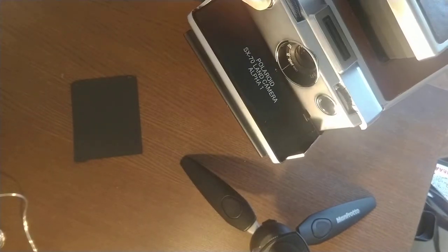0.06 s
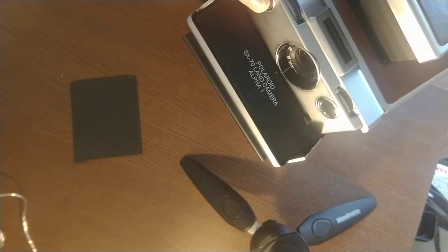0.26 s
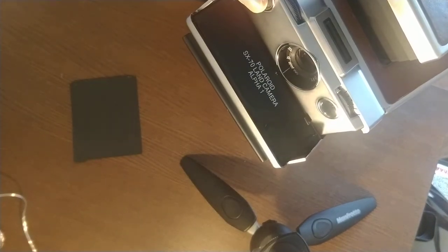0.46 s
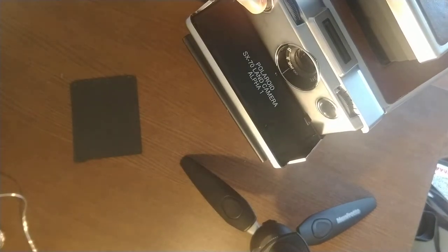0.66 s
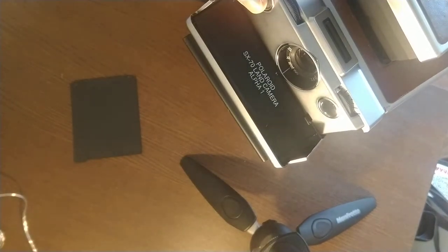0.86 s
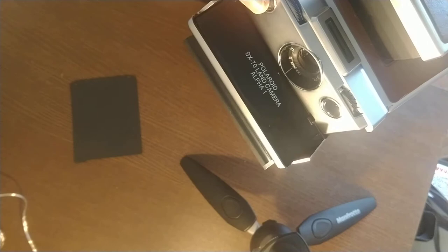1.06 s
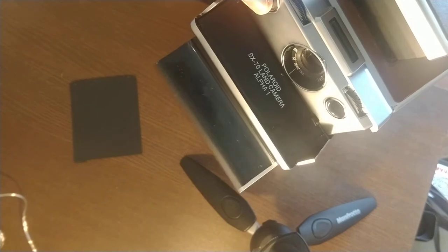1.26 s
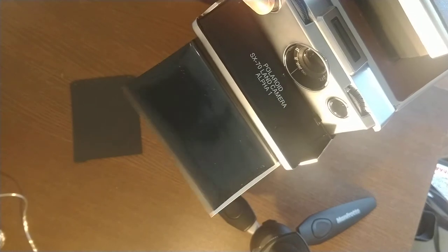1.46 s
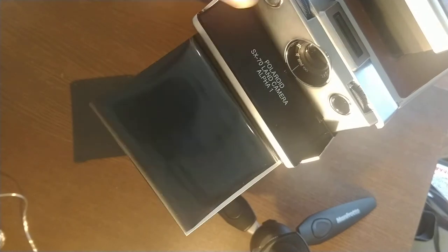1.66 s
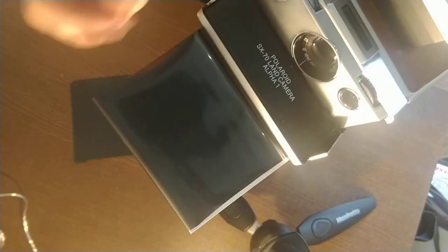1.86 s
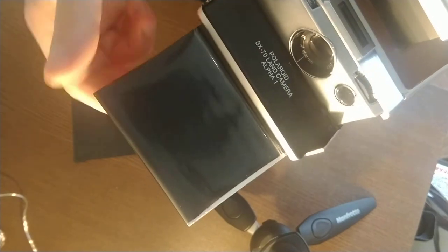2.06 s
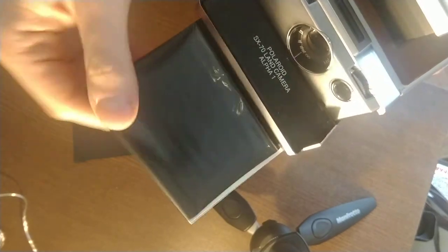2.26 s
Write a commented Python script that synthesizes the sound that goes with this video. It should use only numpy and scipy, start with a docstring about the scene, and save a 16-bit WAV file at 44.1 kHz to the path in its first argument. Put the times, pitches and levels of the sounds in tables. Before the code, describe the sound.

Instant camera shutter clicks and a geared motor whirring as it ejects a print, close up.

```python
"""An instant camera on a table takes a picture and pushes out the print, close to a stereo microphone.
Over quiet room air the shutter clicks, a small geared motor winds briefly, and the mirror slaps up,
ringing the body and rattling loose parts. The shutter clicks again and the motor restarts, humming,
growling and hissing as it labours to feed the print through rumbling rollers. A spring latch snaps and
leaves a thin metal ring; the motor runs free, then coasts to a stop."""
import sys
import numpy as np
from scipy import signal
from scipy.fft import rfft, irfft
from scipy.io import wavfile
from scipy.ndimage import uniform_filter1d

SR = 44100
rng = np.random.default_rng(int(sys.argv[2]) if len(sys.argv) > 2 else 0)


def master(y):
    """Save y as 16-bit WAV."""
    cut = np.clip(np.atleast_2d(y).T, -1, 1)
    pcm = np.round(cut * 32767)  # scale
    wavfile.write(sys.argv[1], SR, pcm.astype(np.int16))


N = 101429
T, HZ = np.arange(N) / SR, np.fft.rfftfreq(N, 1 / SR)

# tone of the room air: freq_hz, level_db
AIR_COLOUR = [(25, -7.5), (60, 5.5), (100, 15), (140, -2.5), (300, -9.5), (700, -9.5), (1500, -16.5),
              (3000, -19), (8000, -25.5), (15000, -27.5)]
# tone of the reflections from table and room: freq_hz, gain_db
REFLECTION_EQ = [(100, 14.5), (1500, -5), (5000, 2), (14000, -2.5)]
# phase of the right microphone port in the bass and mids: freq_hz, lag_rad
RIGHT_PORT_LAG = [(30, -6.2), (80, -5.8), (170, -4.3), (330, -2.9), (800, -1.2), (1650, .8), (2100, 0)]
# share of the clatter that reaches each port by its own path: freq_hz, gain_db
SCATTER_EQ = [(100, -17.5), (600, -5), (1500, -33), (2600, -8.5), (3800, -11.5), (6000, 1.5), (9000, -10.5),
              (14000, -21.5)]
# stereo lean of the camera: freq_hz, left_minus_right_db
PORT_BALANCE = [(170, 9), (320, -6.5), (550, 1), (900, -1), (1550, 3.5), (2300, 0), (3800, 0.5), (5500, 3),
                (7300, 9), (9300, 0.5), (10300, 4.5), (14000, -3)]

# rumble of the rollers as they grip the print: time_s, level_db
ROLLER_LEVEL = [(.55, -67), (.75, -62), (1.02, -75.5), (1.2, -64), (1.62, -63), (2.05, -62.5), (2.2, -85.5)]
# tone of that rumble: freq_hz, level_db
ROLLER_COLOUR = [(60, -20), (120, -12), (170, -1), (250, -10), (400, 2.5), (900, -48)]
# soft bumps of the camera on its stand: start_s, level_db, pitch_hz
STAND_BUMPS = [(0.692, -47.5, 164.8), (0.694, -53.5, 78.6), (1.621, -47, 209.9), (1.84, -60, 75.37)]
# thin metal left ringing by the latch: pitch_hz, level_db
METAL_TONES = [(1411, -79.5), (1766, -86)]
# tone of the loose parts: freq_hz, level_db
RATTLE_COLOUR = [(100, -30), (200, 1), (280, -16.5), (550, 3), (780, 2), (1000, -9), (1450, -13),
                 (2200, -10.5), (3400, -16.5), (8000, -15.5), (12000, -29.5)]
# jolts of the frame by mirror and latch: start_s, level_db, pitch_hz
FRAME_JOLTS = [(0.3899, -12, 798), (1.7058, -26, 423.4)]

# small clicks of shutter, cams and switches: start_s, snap_db, knock_db, decay_s
CLICK_HITS = [(0.1357, -39.5, -41, 0.011), (0.1471, -28.5, -34, 0.0024), (0.3054, -32, -29, 0.0028),
              (0.3088, -44, -32, 0.0023), (0.3893, -28, -22, 0.003), (0.488, -40, -46, 0.0087),
              (0.4937, -24.5, -36, 0.0019), (.878, -37, -52, 0.00097), (1.3911, -42, -30, 0.0027),
              (1.6271, -31.5, -27, 0.0013), (1.7036, -25, -22, 0.0031), (2.0237, -21, -32.5, 0.0019)]
# bright top of a click: freq_hz, level_db
SNAP_COLOUR = [(1000, -56), (2200, 10), (3400, 1), (4700, 4), (5900, 2.5), (8300, 7.5), (11000, 2),
               (14000, 9), (16000, -20)]
# dull bottom of a click: freq_hz, level_db
KNOCK_COLOUR = [(60, -43.5), (220, -22), (450, -5), (750, -11.5), (1000, -8), (1700, 1.5), (2200, -5),
                (4000, -12), (8000, -39)]
# shutter blades closing, then opening: start_s, level_db
SHUTTER_HITS = [(.1475, -1), (.4937, 3.5)]
# ring of the blades: pitch_hz, level_db, t60_s
BLADE_MODES = [(741, -41, 0.081), (1110, -50, 0.016)]
# the mirror slapping up and chattering: start_s, level_db
MIRROR_HITS = [(.3904, -5), (.4005, -16.5), (.4175, -15.5), (.432, -23), (.453, -20.5)]
# ring of the camera body: pitch_hz, level_db, t60_s
BODY_MODES = [(178, -37, 0.24), (216, -34.5, .24), (320, -31, 0.07), (410, -30, 0.06), (513, -26, .06),
              (632, -28.5, 0.13), (720, -29, .08), (791, -25, .05), (880, -24.5, 0.05), (1269, -19, 0.019),
              (1600, -17, 0.016)]
# blows of the spring latch: start_s, level_db
LATCH_HITS = [(1.7057, -2.5), (1.7465, -18.5)]
# ring of the latch: pitch_hz, level_db, t60_s
LATCH_MODES = [(1592, -11.5, 0.06), (1690, -27, 0.055), (1584, -23, 0.38), (668, -42, .3), (3250, -26, .03),
               (5740, -29.5, 0.069)]

# motor speed, sagging under load: time_s, turns_per_s
MOTOR_SPEED = [(.19, 74), (.255, 144), (.29, 164), (.32, 158), (.38, 104), (.53, 70), (.6, 136),
               (.665, 174), (.75, 148), (.81, 161), (.9, 147), (.96, 162.4), (1.05, 158), (1.235, 156),
               (1.29, 159), (1.645, 162), (1.695, 145), (1.72, 176), (1.81, 173), (2.03, 173.3), (2.17, 61)]
# fader ride of the motor's hum: time_s, level_db
HUM_LEVEL = [(.2, -64), (.24, -53), (.3, -44), (.35, -67), (.56, -63), (.6, -51), (.8, -46), (.93, -44.5),
             (1.14, -47), (1.3, -46), (1.69, -45), (1.735, -55), (1.81, -43.5), (1.93, -43), (1.97, -40),
             (2.02, -41.5), (2.032, -70)]
# harmonics of the hum: multiple_of_speed, loaded_db, free_db
HUM_HARMONICS = [(2, -21.5, -19), (3, -5, 0), (4, -5, -25.5), (5, -5.5, -31), (6, -20, -15.5),
                 (7, -15.5, -16), (9, -20.5, -6.5)]
# fader rides of the gear train: time_s, growl_db, hiss_db
GEAR_LEVELS = [(.14, -89, -60), (.185, -56, -55.5), (.22, -37.5, -49), (.25, -43, -42), (.315, -46, -46),
               (.375, -50, -54.5), (.48, -60, -65), (.535, -50, -54), (.575, -41, -45.5), (.72, -43.5, -40),
               (1.0, -46, -41), (1.68, -44.5, -40.5), (1.78, -44, -44.5), (1.95, -46.5, -43),
               (2.05, -43, -40.5), (2.12, -59.5, -54.5), (2.18, -78, -78)]
# tone of the gears' growl: freq_hz, level_db
GROWL_COLOUR = [(40, -25), (120, -12.5), (180, -10.5), (270, -32), (380, -11.5), (520, 0.5), (800, 2.5),
                (930, -4.5), (1450, 7.5), (1720, 4.5), (2200, -0.5), (3000, -23), (6000, -53)]
# resonances of the gear housing, on top of the growl: centre_hz, width_hz, boost_db
HOUSING_PEAKS = [(510, 40, 7), (632, 40, 6), (745, 45, 7), (812, 40, 6), (1150, 70, 5)]
# tone of the gears' hiss: freq_hz, level_db
HISS_COLOUR = [(900, -38.5), (2000, -12.5), (2900, -0.5), (4400, -1), (5000, -2), (5900, 0), (6600, -2.5),
               (7600, 3.5), (9500, 3), (10900, -1.5), (12500, -8), (13800, 2), (14700, -17.5),
               (15400, -64.5)]
# narrow resonances of gears and frame, on top of the hiss: centre_hz, width_hz, boost_db
WHINE_PEAKS = [(3816, 210, 6.5), (5721, 36, 6.5), (6050, 37, 6), (7500, 52, 9.5), (7980, 49, 3.5),
               (8100, 40, 9), (8400, 110, 3.5)]


def amp(db):
    """Decibels to gain."""
    return 10 ** (np.asarray(db) / 20)


def unit_rms(x):
    """Scales to rms 1."""
    return x / np.sqrt(np.mean(x ** 2) + 1e-20)


def automation(rows):
    """One lane per value column of a time table, its points joined by straight lines."""
    times, *columns = np.transpose(rows)
    return [np.interp(T, times, column) for column in columns]


def eq_curve(points):
    """Draws a frequency table across the spectrum, on a log axis."""
    hz, value = np.transpose(points)
    return np.interp(np.log(HZ + 1), np.log(hz), value)


def bells(rows):
    """Resonances as bell-shaped boosts in dB."""
    return sum(db / (1 + (2 * (HZ - hz) / width) ** 2) for hz, width, db in rows)


def tint(x, gain):
    """Filters x, keeping the power of white noise."""
    return irfft(rfft(x) * unit_rms(gain), N)


def low_cut(x, cutoff_hz=120):
    """Small parts radiate no deep bass."""
    return signal.sosfilt(signal.butter(2, cutoff_hz, "high", fs=SR, output="sos"), x)


def noise(colour):
    """Coloured noise of about rms 1."""
    return tint(rng.standard_normal(N), amp(eq_curve(colour)))


def wander(rate_hz):
    """Random drift of rms 1, rolling off above the given rate."""
    return unit_rms(tint(rng.standard_normal(N), np.exp(-(HZ / rate_hz) ** 2)))


def shimmer(x, depth_db=2.2):
    """The colour flickers in random patches about 40 ms long and 130 Hz wide."""
    spectra = signal.stft(x, nperseg=1024, noverlap=768)[2]
    patches = uniform_filter1d(rng.standard_normal(spectra.shape[::-1]), 7, axis=0)  # along time
    patches = uniform_filter1d(patches, 3, axis=1)  # along frequency
    gain = unit_rms(amp(depth_db * unit_rms(patches.T)))
    return signal.istft(spectra * gain, nperseg=1024, noverlap=768)[1][:N]


def envelope(start_s, attack_s, decay_s):
    """A straight attack, then exponential decay."""
    age = np.maximum(T - start_s, 0)
    return np.minimum(age / attack_s, 1) * np.exp(-np.maximum(age - attack_s, 0) / decay_s)


def thumps(hits, attack_s, decay_s):
    """One damped sine per hit."""
    return sum(amp(db) * envelope(start, attack_s, decay_s) * np.sin(2 * np.pi * hz * (T - start))
               for start, db, hz in hits)


def strike(hits, modes):
    """Damped modes of alternating sign, set ringing by each hit."""
    ring = sum((-1) ** k * amp(db - 60 * np.minimum(T / t60, 2)) * np.sin(2 * np.pi * hz * T)
               for k, (hz, db, t60) in enumerate(modes))
    return sum(amp(db) * np.interp(T - start, T, ring, left=0) for start, db in hits)


def mic_ports(x, left_delay_s=.000412):
    """Two microphone ports of opposite polarity; the left one hears the treble later."""
    left = -np.exp(-2j * np.pi * HZ * left_delay_s)
    right = np.exp(-1j * eq_curve(RIGHT_PORT_LAG))
    return irfft(rfft(x) * np.array([left, right]), N)


def room_air():
    """A quiet bed of air, mostly shared by the ports, with a little of its own in each."""
    shared = mic_ports(noise(AIR_COLOUR))
    separate = np.array([noise(AIR_COLOUR), noise(AIR_COLOUR)])
    return amp(-69) * (shared + .3 * separate)


def reflections(x, early_t60_s=.059, late_t60_s=.13, late_db=3.5):
    """Quick reflections from the table and a short room tail, different at each port."""
    t = T[:SR // 2]
    fade = (amp(-60 * t / early_t60_s) + amp(late_db - 60 * t / late_t60_s)) * (t > .001)
    tail = rng.standard_normal((2, len(t))) * fade / np.linalg.norm(fade)
    send = irfft(rfft(x) * amp(eq_curve(REFLECTION_EQ)), N)
    return amp(-4.5) * signal.fftconvolve(send[None], tail, axes=1)[:, :N]


def rollers():
    """A low rumble while the rollers turn."""
    turning = (T > ROLLER_LEVEL[0][0]) & (T < ROLLER_LEVEL[-1][0])
    return noise(ROLLER_COLOUR) * amp(automation(ROLLER_LEVEL)[0]) * turning


def metal_ring():
    """Faint metal tones come in with the latch and hold, outlasting the motor."""
    tones = np.sqrt(2) * sum(amp(db) * np.sin(2 * np.pi * hz * T) for hz, db in METAL_TONES)
    return tones * envelope(LATCH_HITS[0][0], attack_s=.01, decay_s=np.inf)


def stand_bumps():
    """The whole camera bumps on its stand, low and soft."""
    return thumps(STAND_BUMPS, attack_s=.0042, decay_s=.023)


def rattle():
    """Loose parts rattle after the mirror's slap."""
    return amp(-33.5) * noise(RATTLE_COLOUR) * envelope(MIRROR_HITS[0][0], attack_s=.00088, decay_s=.045)


def frame_jolts():
    """Mirror and latch each jolt the frame: one hard push that dies at once."""
    return thumps(FRAME_JOLTS, attack_s=.00078, decay_s=.00079)


def clicks(attack_s=.0007, tail_db=-24, tail_s=.016):
    """Each click layers a bright snap on a duller knock, with a short tail in the housing."""
    snap, knock, track = noise(SNAP_COLOUR), noise(KNOCK_COLOUR), np.zeros(N)
    for start, snap_db, knock_db, decay_s in CLICK_HITS:
        shape = envelope(start, attack_s, decay_s) + amp(tail_db) * envelope(start, attack_s, tail_s)
        track += shape * (amp(snap_db) * snap + amp(knock_db) * knock)
    return track


def shutter():
    """The blades ring briefly as they close and open."""
    return strike(SHUTTER_HITS, BLADE_MODES)


def body_ring(click_send_db=-14):
    """The mirror's slap, and more faintly each click, rings the camera body."""
    knocks = [(start, knock_db + click_send_db) for start, _, knock_db, _ in CLICK_HITS]
    return strike(MIRROR_HITS + knocks, BODY_MODES)


def latch():
    """The spring latch snaps with a bright ping, then strikes again more softly."""
    return strike(LATCH_HITS, LATCH_MODES)


def motor_hum(turns, free_at_s=1.73, crossfade_s=.037, flutter_hz=45):
    """Harmonics of the motor shaft: rough under load, purer and differently balanced running free."""
    free = np.clip((T - free_at_s) / crossfade_s + .5, 0, 1)
    flutter_depth = np.interp(free, [0, 1], [.31, .1])
    # the fourth harmonic swells as the print enters the rollers
    swell_db = 7.5 * np.exp(-((T - 1.028) / .1) ** 2)
    hum = np.zeros(N)
    for multiple, loaded_db, free_db in HUM_HARMONICS:
        flutter = 1 + flutter_depth * (wander(flutter_hz) + 1j * wander(flutter_hz))  # level and phase
        harmonic = np.exp(2j * np.pi * (multiple * turns + rng.random()))
        level_db = loaded_db + (free_db - loaded_db) * free + swell_db * (multiple == 4)
        hum += amp(level_db) * (flutter * harmonic).real
    running = (T > HUM_LEVEL[0][0]) & (T < HUM_LEVEL[-1][0])
    return np.sqrt(2) * hum * amp(automation(HUM_LEVEL)[0]) * running


def gear_train(turns, teeth=3, mesh_depth=.13):
    """Teeth rub in uneven pulses: a growl in the housing and a hiss with a narrow whine on top."""
    tooth_pulse = 1 + mesh_depth * np.cos(2 * np.pi * teeth * turns)
    shaft_pulse = 1 + .12 * np.cos(2 * np.pi * turns)
    fade_in = envelope(GEAR_LEVELS[0][0], attack_s=.0032, decay_s=np.inf)
    fade_out = np.exp(-np.maximum(T - GEAR_LEVELS[-1][0], 0) / .093)
    rub = unit_rms(tooth_pulse * shaft_pulse) * fade_in * fade_out
    growl = tint(rub * rng.standard_normal(N), amp(eq_curve(GROWL_COLOUR) + bells(HOUSING_PEAKS)))
    hiss = tint(rub * shimmer(rng.standard_normal(N)), amp(eq_curve(HISS_COLOUR) + bells(WHINE_PEAKS)))
    growl_db, hiss_db = automation(GEAR_LEVELS)
    return growl * amp(growl_db) + hiss * amp(hiss_db)


def scene():
    """The stereo mix: the camera direct, reflected and scattered, over quiet room air."""
    speed = automation(MOTOR_SPEED)[0] * (1 + .005 * wander(rate_hz=30.65))
    turns = np.cumsum(speed) / SR
    # the same moves with fresh noise on each path give the clatter its width
    clatter, *scattered = [low_cut(gear_train(turns) + clicks() + rattle()) + rollers()
                           for path in ("direct", "left", "right")]
    impacts = low_cut(body_ring() + shutter() + latch() + frame_jolts()) + stand_bumps()
    camera = mic_ports(clatter + impacts + motor_hum(turns) + metal_ring()) + reflections(clatter)
    spectrum = rfft(camera) + rfft(np.array(scattered)) * amp(eq_curve(SCATTER_EQ))
    pan = amp(np.outer([.5, -.5], eq_curve(PORT_BALANCE)))
    return irfft(spectrum * pan, N) + room_air()


def record(dry):
    """A steep high cut at 16.3 kHz on the whole mix."""
    high_cut = signal.firwin(511, 16300, window=("kaiser", 9), fs=SR)
    return signal.oaconvolve(dry, high_cut[None], "same")


dry = scene()
out = record(dry)
master(out)
```